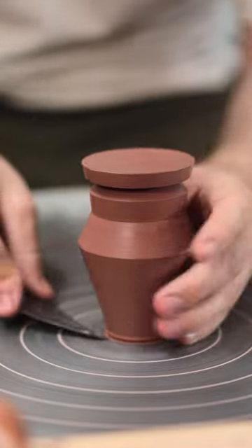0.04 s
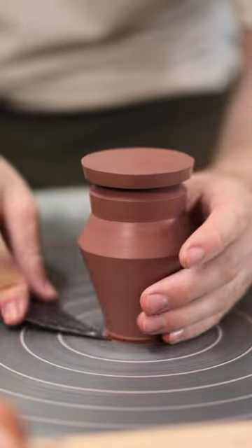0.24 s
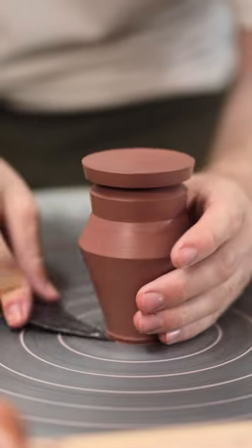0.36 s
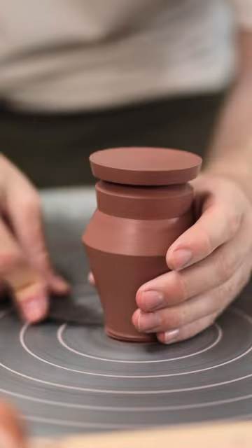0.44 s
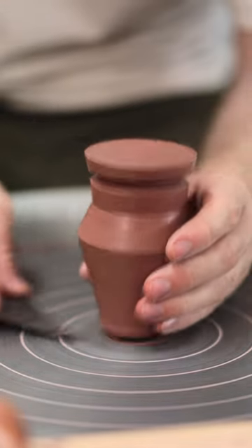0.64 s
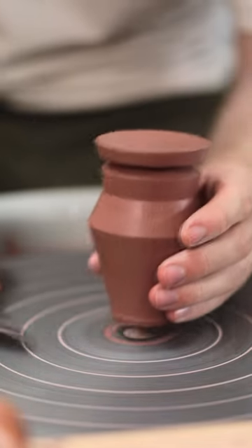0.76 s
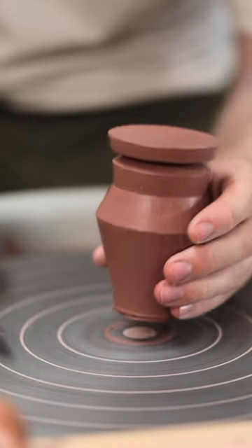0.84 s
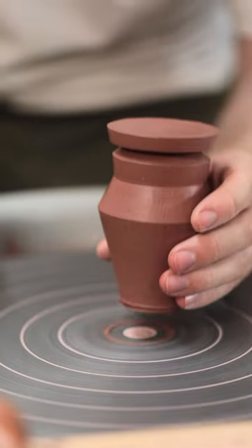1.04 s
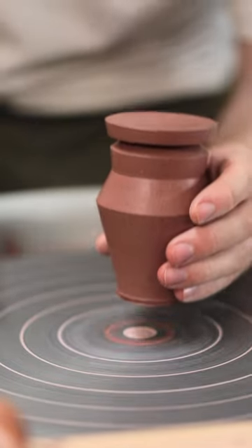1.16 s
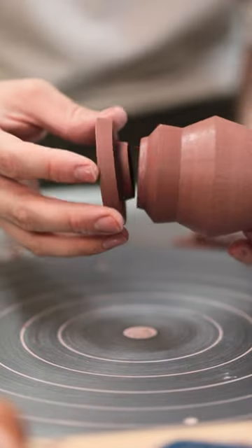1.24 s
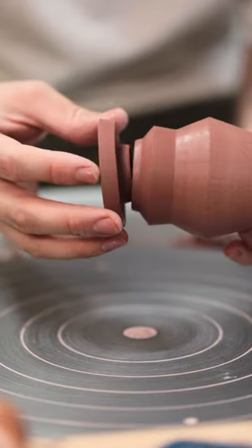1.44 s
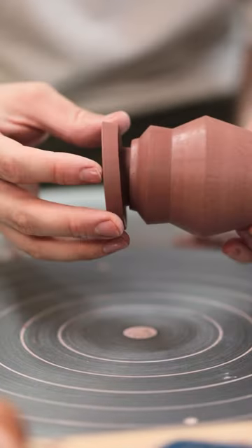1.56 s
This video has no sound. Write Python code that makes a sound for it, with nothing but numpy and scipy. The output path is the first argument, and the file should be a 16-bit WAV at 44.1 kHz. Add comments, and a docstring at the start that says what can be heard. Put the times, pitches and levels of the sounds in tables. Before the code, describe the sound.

Crisp scraping clicks as a steel blade pries a clay jar off a pottery wheel.

```python
"""A thin steel blade is pushed under a small clay jar on a pottery wheel, close by in a quiet studio.
Sliding friction makes the dry clay scrape, hiss and crumble; its chips excite blade and jar in crisp clicks.
The jar cracks loose, the blade slides out with a thin squeak, and fingers brush the lid.
Behind it a motor hums softly through the resonances of its housing, and everything fades at the end."""
import sys
import numpy as np
from scipy import signal
from scipy.fft import rfft, irfft, next_fast_len
from scipy.io import wavfile
from scipy.ndimage import map_coordinates

SR = 44100
rng = np.random.default_rng(int(sys.argv[2]) if len(sys.argv) > 2 else 0)


def wrap_up_sound(samples):
    """Save the sound to the file named by the first command line argument, as 16-bit audio."""
    columns = np.atleast_2d(samples).T
    # keep every value between -1 and 1, then stretch to whole-number steps
    tamed = np.clip(columns, -1, 1)
    steps = np.round(tamed * 32767).astype(np.int16)
    wavfile.write(sys.argv[1], SR, steps)


N = 70560

# Envelopes of the friction sounds and the motor: (time [s], level [dB])
SCRAPE_ENVELOPE = [(0, -56), (.15, -46.5), (.235, -40.5), (.275, -39.5), (.3, -41), (.362, -38),
                   (.376, -31.5), (.405, -33.5), (.432, -30.5), (.452, -36.5), (.464, -24.5), (.478, -27.5),
                   (.552, -30.5), (.585, -36), (.63, -40.5), (.665, -46.5), (.75, -51.5), (.84, -55.5),
                   (1.2, -63.5)]
GRIT_ENVELOPE = [(0, -53.5), (.06, -46.5), (.105, -37.5), (.14, -47.5), (.2, -49.5), (.44, -57),
                 (.468, -32.5), (.487, -19.5), (.502, -27), (.51, -17.5), (.519, -35), (.57, -54),
                 (.6, -32.5), (.63, -45), (.73, -66.5)]
CRUMBLE_ENVELOPE = [(0, -56), (.3, -47.5), (.45, -45.5), (.466, -29), (.48, -37.5), (.515, -35), (.56, -48),
                    (.65, -46.5), (.8, -60)]
STRAIN_ENVELOPE = [(0, -63), (.22, -58), (.44, -49.5), (.5, -51.5), (.85, -73.5)]
SQUEAK_ENVELOPE = [(.66, -85), (.7, -50), (.742, -48), (.76, -56), (.781, -51), (.83, -88)]
HUM_ENVELOPE = [(0, 2.5), (.12, 1), (.27, 2), (.53, -0.5), (.59, 0.5), (.72, 2), (.95, -1), (1.03, 1),
                (1.28, 1), (1.6, -4.5)]
# Spectra of the broadband noises: (frequency [Hz], gain [dB])
SCRAPE_SPECTRUM = [(130, -50.5), (1000, -14.5), (2500, -10), (3900, -20), (4600, -4.5), (5400, -10.5),
                   (6500, 2), (7400, 1), (8500, -1), (10200, -2.5), (12000, -26), (14200, -14.5),
                   (15500, -11), (16100, -47)]
GRIT_SPECTRUM = [(4000, -25.5), (8800, -10.5), (10200, -0.5), (11300, 0.5), (12200, 1), (13400, -11),
                 (15500, -18), (16100, -39.5)]
CRUMBLE_SPECTRUM = [(130, -36), (260, -7), (700, -8.5), (1300, -0.5), (1900, -0.5), (2350, 3), (3000, 4.5),
                    (3900, 0.5), (4700, -0.5), (6000, -7.5), (10000, -34.5)]
AIR_SPECTRUM = [(25, -21), (130, -3), (290, 4), (420, -6.5), (1050, 0), (1400, -4), (2700, -7.5),
                (3600, -23.5), (5500, -28), (6900, -19), (8600, -24.5), (10200, -14), (13000, -20.5),
                (15700, -21.5), (16100, -39.5)]
# Resonances: (frequency [Hz], bandwidth [Hz], gain [dB])
STRAIN_MODES = [(280, 88, 1.5), (401, 84, 0.5)]
HOUSING_MODES = [(95.4, 6.6, -4), (220, 70, -5.5), (603, 66, -2), (655.5, 49, -1.5), (887.5, 27, -0.5),
                 (918, 30, -7), (16000, 49, -7)]  # the highest is a thin whine
BLADE_MODES = [(7470, 580, 4.5), (9980, 1400, 2.5), (11850, 470, -6), (15200, 1300, -16.5)]
SQUEAK_MODES = [(4280, 300, 6), (4950, 300, -5.5)]
# Steady tones of the motor: (frequency [Hz], level [dB])
MOTOR_TONES = [(663, -55), (876, -53), (934, -56.5)]
# Passing tones in the hum: (start [s], end [s], frequency [Hz], peak level [dB])
SWELLING_TONES = [(.03, 0.308, 220, -53.5), (0.175, .65, 490, -52), (0.43, 0.67, 240, -53.5),
                  (0.663, 0.895, 213, -53), (1.13, 1.487, 214, -54), (0.806, 1.11, 4280, -69),
                  (1.125, 1.232, 4270, -66.5)]
# Clay chipping at the blade's edge: (time [s], level [dB], tilt [dB/octave], relative knock level [dB])
CLAY_CHIPS = [(0.1729, -34.5, -6.5, -21.5), (0.2204, -24.5, -3, -18.5), (.2531, -25.5, -6, -20.5),
              (0.2563, -28.5, -5.5, -11), (0.26, -30, -12, -13), (0.3055, -30, 0.5, -24),
              (0.319, -27, -5, -15), (.357, -36, -3.5, -16), (.3647, -26, -4.5, -8),
              (0.3697, -15, -0.5, -13), (.3832, -25.5, 0.5, -15.5), (0.4008, -24, -7, -15.5),
              (0.4098, -10, -2, -27.5), (.4153, -30, 0.5, -24.5), (.4380, -22, -4, -13),
              (0.4572, -16.5, -2, -11), (0.4598, -22.5, -2.5, -27.5), (0.4623, -20.5, -3, -9.5),
              (.4641, -14, -17, -12), (0.4655, -18, -7, -8), (0.4684, -14, -1, -8), (.4834, -24, 16.5, -11),
              (0.526, -33, -2, -22), (0.5289, -10, -3.5, -14.5), (0.5457, -18.5, 13, -22.5),
              (.5743, -27, -7, -30), (0.5908, -25.5, 11, -34), (0.6125, -33, 13, -13),
              (0.6426, -37.5, 0, -6.5)]
# Ceramic modes of the jar: (frequency [Hz], level [dB])
JAR_MODES = [(2470, 0.5), (2880, -2.5), (3500, -6), (4560, 1.5)]
# Overall gain with the closing fade: (time [s], level [dB])
FADE_ENVELOPE = [(1.08, -3), (1.3, -3.5), (1.45, -8), (1.6, -15.5)]

TIME = np.arange(N) / SR
CHIP_TIME = TIME[:2048]
DETUNE = 0.0067  # relative scatter of mode frequencies from chip to chip


def amp(db):
    """Amplitude ratio of a level in decibels."""
    return 10 ** (np.asarray(db) / 20)


def unit(x):
    """Normalisation to an rms of 1."""
    return x / np.sqrt(np.mean(x ** 2) + 1e-20)


def burst(x):
    """Normalisation of a transient to the energy of 3 ms at an rms of 1."""
    return x / np.sqrt(np.sum(x ** 2) / (.003 * SR))


def envelope(points):
    """Gain per sample, interpolated through (time [s], level [dB])."""
    return amp(np.interp(TIME, *np.transpose(points)))


def wobble(rate):
    """Smooth random modulation with `rate` knots per second."""
    return map_coordinates(rng.standard_normal(2000), [TIME * rate], mode="mirror")


def filtered(x, response):
    """Linear filtering: the spectrum is multiplied by a frequency response."""
    size = next_fast_len(len(x) + 4096)
    return irfft(rfft(x, size) * response(np.fft.rfftfreq(size, 1 / SR)), size)[:len(x)]


def colour(points):
    """Response through (frequency [Hz], gain [dB]) on a logarithmic frequency axis."""
    hz, db = np.transpose(points)
    return lambda f: amp(np.interp(np.log(f + 1), np.log(hz), db))


def resonances(modes, stretch=1, sign=-1):
    """Superposition of damped resonators; sign=1 leaves antiresonances between them."""
    return lambda f: sum(sign ** k * amp(db) * 1j * f * bw / ((hz * stretch) ** 2 - f * f + 1j * f * bw)
                         for k, (hz, bw, db) in enumerate(modes))


def noise(response):
    """White noise shaped by a response, at an rms of 1."""
    return unit(filtered(rng.standard_normal(N), response))


def friction(spectrum, grains_per_s=9800, spread_db=1, flutter_db=1.5):
    """Friction as shot noise: dense impulses of uneven size in fluttering clumps."""
    grains = (rng.random(N) < grains_per_s / SR) * rng.choice([-1, 1], N)
    sizes = amp(spread_db * np.minimum(rng.exponential(size=N), 5))
    flutter = amp(flutter_db * wobble(220))
    return unit(filtered(grains * sizes * flutter, colour(spectrum)))


def blade_scrape():
    """Sliding friction between the blade and the jar radiates broadband noise."""
    return envelope(SCRAPE_ENVELOPE) * friction(SCRAPE_SPECTRUM)


def grit_hiss():
    """Tiny contacts of fine grit on steel merge into a high hiss."""
    return envelope(GRIT_ENVELOPE) * friction(GRIT_SPECTRUM)


def foot_crumble():
    """Brittle fracture of the jar's foot gives midrange noise as it breaks free."""
    return envelope(CRUMBLE_ENVELOPE) * friction(CRUMBLE_SPECTRUM)


def jar_strain():
    """Friction of the jar straining against the wheel head drives two low resonances."""
    return envelope(STRAIN_ENVELOPE) * noise(resonances(STRAIN_MODES))


def wavering_tone(hz, waver_db=1.6, wander_rad=1):
    """Random amplitude and phase modulation broaden a sinusoid into a narrow band."""
    gain = amp(waver_db * wobble(12.2))
    return unit(gain * np.sin(2 * np.pi * hz * TIME + wander_rad * wobble(14)))


def motor_hum(housing_db=-49.5):
    """Forced vibration: the motor's tones sound over the resonant noise of its housing."""
    tones = sum(amp(db) * wavering_tone(hz) for hz, db in MOTOR_TONES)
    housing = amp(housing_db) * noise(resonances(HOUSING_MODES))
    return envelope(HUM_ENVELOPE) * (tones + housing)


def room_air(level_db=-51):
    """The room's air is stationary noise, strongest at low frequencies."""
    return amp(level_db) * noise(colour(AIR_SPECTRUM))


def hum_swells():
    """Faint tones swell and sink in the hum under half-sine envelopes."""
    swells = np.zeros(N)
    for start, end, hz, db in SWELLING_TONES:
        progress = np.clip((TIME - start) / (end - start), 0, 1)
        swells += amp(db) * np.sin(np.pi * progress) * wavering_tone(hz)
    return swells


def blade_response(tilt_db, low_hz=6030, top_hz=15500, travel_s=.0006):
    """A thin blade resonates, disperses bending waves and radiates little bass."""
    steel = resonances(BLADE_MODES, 1 + DETUNE * rng.standard_normal(), sign=1)

    def response(f):
        # travel_s holds at 10 kHz, lower waves arrive later; the linear term removes a common delay
        dispersion = np.exp(-2j * np.pi * travel_s * (2 * np.sqrt(f * 1e4) - .8 * f))
        radiation = 1 / np.sqrt((1 + (low_hz / (f + 1)) ** 8) * (1 + (f / top_hz) ** 50))
        tilt = amp(tilt_db * np.log2(np.clip(f / low_hz, 1, 2)))
        return steel(f) * dispersion * radiation * tilt
    return response


def blade_click(tilt_db, spread_s=.0008, slip_loss_db=5.5, ring_db=-6, ring_t60_s=.015):
    """Impulse excitation: three tiny slips, each weaker than the last, ring the blade briefly."""
    slips, order = np.zeros(len(CHIP_TIME)), np.arange(3)
    onsets = (order + rng.uniform(0, 1, 3)) / 3 * spread_s
    np.add.at(slips, (onsets * SR).astype(int), amp(-slip_loss_db * order) * rng.choice([-1, 1], 3))
    ring = rng.standard_normal(len(CHIP_TIME)) * amp(-60 * CHIP_TIME / ring_t60_s)
    blade = blade_response(tilt_db)
    return burst(filtered(slips, blade)) + amp(ring_db) * burst(filtered(ring, blade))


def jar_knock(ring_t60_s=.022, scatter_db=2.5, crunch_t60_s=.016):
    """Damped free vibration of the jar, with an equally strong crunch of breaking clay."""
    t = CHIP_TIME
    modes = np.zeros(len(t))
    for hz, db in JAR_MODES:
        gain = amp(db + scatter_db * rng.standard_normal()) * rng.choice([-1, 1])
        detuned_hz = hz * (1 + DETUNE * rng.standard_normal())
        modes += gain * np.sin(2 * np.pi * detuned_hz * t)
    ring = modes * amp(-60 * t / ring_t60_s)
    fracture = rng.standard_normal(len(t)) * amp(-60 * t / crunch_t60_s)
    crunch = filtered(fracture, colour(CRUMBLE_SPECTRUM))
    return burst(burst(ring) + burst(crunch))


def clay_chips():
    """Each brittle fracture excites the blade and the jar at the same instant."""
    chips = np.zeros(N + SR)
    for start, db, tilt_db, knock_db in CLAY_CHIPS:
        chip = blade_click(tilt_db) + amp(knock_db) * jar_knock()
        chips[round(start * SR):][:len(chip)] += amp(db) * chip
    return chips[:N]


def blade_squeak():
    """Friction drives two narrow resonances as the blade slides out over the wheel head."""
    return envelope(SQUEAK_ENVELOPE) * noise(resonances(SQUEAK_MODES))


def finger_brush(centre_s=1.31, width_s=.051, peak_db=-58):
    """Light friction of fingers on the lid rises and falls in a Gaussian envelope."""
    return amp(peak_db) * np.exp(-((TIME - centre_s) / width_s) ** 2) * friction(SCRAPE_SPECTRUM)


def reverberation(x, t60_s=.61, build_s=.0058, level_db=-14):
    """Diffuse reflections in the studio build up quickly and decay exponentially."""
    t = TIME[:SR // 2]
    tail = rng.standard_normal(len(t)) * amp(-60 * t / t60_s) * (1 - np.exp(-t / build_s))
    return amp(level_db) * signal.fftconvolve(x, tail / np.linalg.norm(tail))[:N]


def scene():
    """Superposition of the handwork, its reverberation and the background, in one channel."""
    work = clay_chips() + blade_squeak() + jar_strain() + finger_brush()
    work += blade_scrape() + grit_hiss() + foot_crumble()
    background = motor_hum() + hum_swells() + room_air()
    return (work + reverberation(work) + background)[None]


def record(dry, peak_limit=.85, cutoff_hz=16150):
    """Soft saturation rounds the highest peaks; a fade and a steep low-pass follow."""
    rounded = dry[0] / (1 + (dry[0] / peak_limit) ** 4) ** (1 / 4)
    faded = rounded * envelope(FADE_ENVELOPE)
    return filtered(faded, lambda f: 1 / (1 + (f / cutoff_hz) ** 200))[None]


dry = scene()
out = record(dry)
wrap_up_sound(out)
```